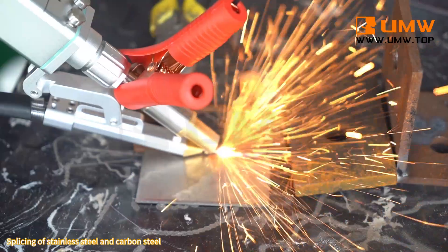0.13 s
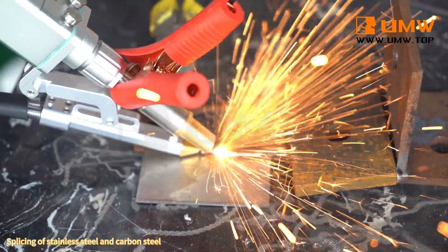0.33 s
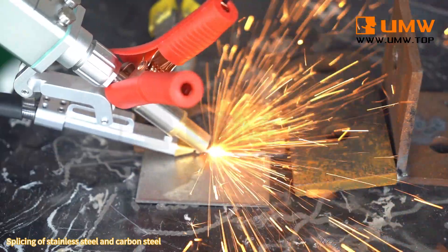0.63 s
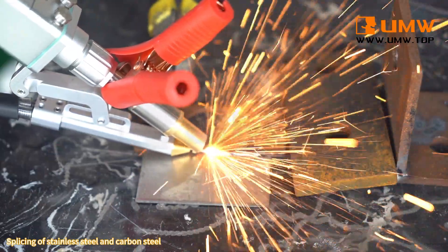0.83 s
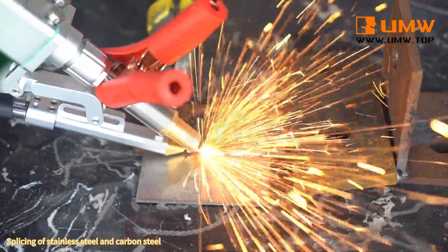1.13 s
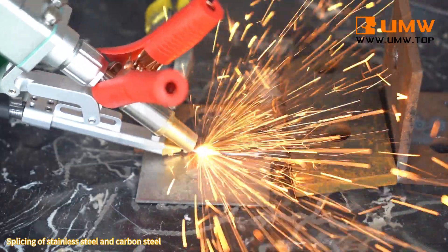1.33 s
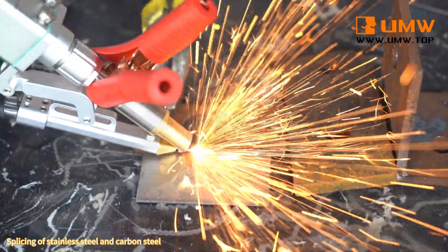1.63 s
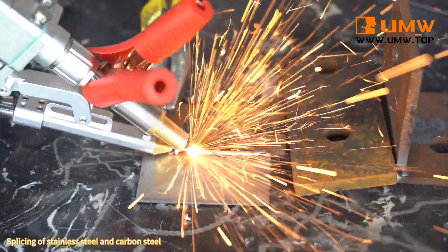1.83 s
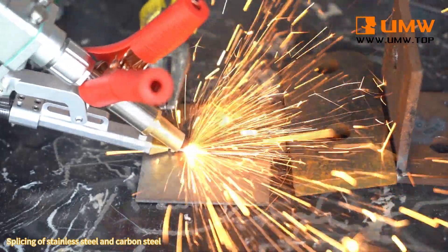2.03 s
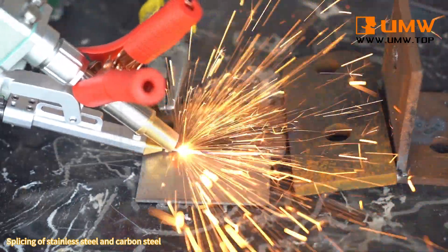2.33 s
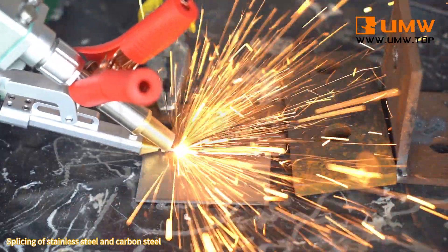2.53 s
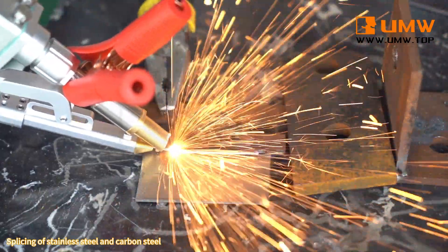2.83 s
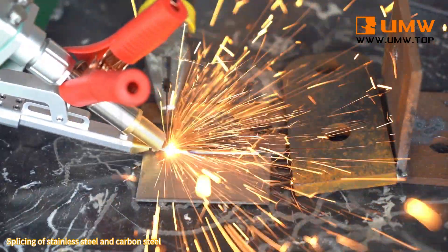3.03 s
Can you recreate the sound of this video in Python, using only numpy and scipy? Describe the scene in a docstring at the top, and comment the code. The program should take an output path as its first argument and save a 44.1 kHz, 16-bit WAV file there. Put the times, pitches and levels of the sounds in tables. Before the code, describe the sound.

A handheld laser welder hisses loudly and steadily, its bright sizzle carrying a faint rapid buzz.

```python
"""Hand-held laser welder

A laser welder runs along a steel seam, close to a camera with two microphone ports.
Shielding gas hisses: noise shaped by the nozzle's resonances, which change along the seam.
The beam swings to and fro: the vapour plume makes the treble sizzle in step, and overtones of the swing buzz.
Stray gas buffets the ports: a lumpy low rumble with a few short, sharp puffs."""
import sys
import numpy as np
from scipy import signal
from scipy.fft import rfft, irfft, next_fast_len
from scipy.io import wavfile
from scipy.ndimage import uniform_filter1d, map_coordinates

SR = 44100
rng = np.random.default_rng(int(sys.argv[2]) if len(sys.argv) > 2 else 0)


def invert_db(x):
    """Field ratio 10**(x/20) for x, a level in decibels (scalar or array-like)."""
    u = np.asarray(x, float) / 20
    return 10 ** u


def unload_audio(sound):
    """Save the sound as a 16-bit wav file, at the path given as the first command line argument."""
    columns = np.transpose(np.atleast_2d(sound))
    # keep every value between -1 and 1, then stretch to whole-number steps
    steps = np.round(np.clip(columns, -1, 1) * 32767)
    wavfile.write(sys.argv[1], SR, steps.astype(np.int16))


N = 139797  # length in samples
SWING_HZ = 98.8  # how often the beam swings to and fro
EAR = np.array([[.5], [-.5]])  # splits a left-over-right difference between left and right

# Resonances of nozzle and workpiece at mid-seam, before the hiss is set to its overall level.
# Each row: pitch in Hz, width in Hz, level in dB, left over right in dB.
RESONANCES = [(593, 73, -15, 0), (757, 310, -15, 0), (1675, 88, 1.5, 0), (2620, 350, -30, -5),
              (3105, 140, -4.5, 1), (3660, 110, -15, 5), (4690, 127, -6, 1), (5160, 320, -10, -9.5),
              (5503, 157, -2.5, 3), (6964, 203, -7, 1.5), (7600, 210, -21, -10), (8320, 150, -9, 0),
              (9255, 106, -5.5, 1.5), (9970, 150, -16, -8), (10620, 420, -13.5, -6), (11500, 240, -15, -10),
              (12240, 270, -18, 5), (13400, 640, -15, -4), (14120, 100, -13.5, 3)]


def unit(x):
    """Scale to an rms (average strength) of 1."""
    return x / np.sqrt(np.mean(x ** 2) + 1e-20)


def along(points, hz):
    """Read a value at each frequency from (Hz, value) points, on a log axis."""
    f, v = np.transpose(points)
    return np.interp(np.log(hz + 1), np.log(f + 1), v)


def curve(rows):
    """Join (seconds, value) points by straight lines, one value per sample."""
    return np.interp(np.arange(N) / SR, *np.transpose(rows))


def wobble(rate):
    """A smooth random curve through this many random points a second."""
    knots = rng.standard_normal(int(N * rate / SR) + 4)
    return map_coordinates(knots, [np.arange(N) * rate / SR])


def filtered(x, response):
    """Shape a sound by a response, real or complex, given as a function of frequency."""
    m = next_fast_len(N + 8192)
    hz = np.fft.rfftfreq(m, 1 / SR)
    return irfft(rfft(x, m) * response(hz), m)[..., :N]


def eddies(patchy_db, drift_db):
    """Turbulence: two white noises share quick patches of random gain and a slow drift of colour."""
    z = signal.stft(rng.standard_normal((2, N)), nperseg=512)[2]

    def blur(bins, frames):
        field = uniform_filter1d(rng.standard_normal(z.shape[1:]), bins, 0)
        return unit(uniform_filter1d(field, frames, 1))

    gain_db = patchy_db * blur(7, 10) + drift_db * blur(3, 70)
    return signal.istft(z * invert_db(gain_db), nperseg=512)[1][:, :N]


def ports(hz, alike):
    """Gains that turn two noises into mid and side, so that left and right are this much alike."""
    turn = np.arccos(np.clip(along(alike, hz), -1, 1)) / 2
    return np.array([np.cos(turn), np.sin(turn)])


def nozzle(hz, at):
    """Left and right response at a place on the seam (-.5 to .5): broad jet plus resonances, cut by dips."""
    # Broad hiss of the jet. Each row: frequency in Hz, relative level in dB.
    jet_tone = [(30, -75), (120, -48), (250, -55), (500, -28), (1200, -20.5), (4000, -17), (7000, -12.5),
                (11000, -16), (14500, -18), (16000, -24.5)]
    # Lean of the broad hiss. Each row: frequency in Hz, left over right in dB.
    jet_pan = [(2000, -1), (5000, -4), (9000, -10), (12000, 2.5), (15000, 2)]
    # What each resonance gains from one end of the seam to the other, in dB.
    travel_db = [-4.5, -2.5, -0.7, -26, -1, -4, 1.5, 4.5, -0.5, 0.5, 23.5, 12, -1.5, -6, -1, 0, 5, -2, 1]
    # Notches in the tone. Each row: frequency in Hz, width in Hz, depth in dB.
    dips = [(1060, 200, 6), (2030, 120, 10), (2800, 120, 5), (4890, 80, 3), (6200, 300, 3), (7470, 130, 8),
            (8570, 120, 5), (9650, 120, 4), (10200, 150, 5), (12370, 170, 7)]
    # How far left leads right at mid-seam, before the bass share below. Each row: frequency in Hz, radians.
    lead = [(3500, .05), (4400, 0.53), (6600, .05), (7800, 0.41), (10200, 0.52), (11500, .75),
            (15200, 0.71)]
    lead_grows = 1.4  # share of the mid-seam lead gained from end to end

    power = invert_db(2 * (along(jet_tone, hz) + EAR * along(jet_pan, hz)))
    for (c, w, db, pan_db), more_db in zip(RESONANCES, travel_db):
        peak = (hz * w) ** 2 / ((c * c - hz * hz) ** 2 + (hz * w) ** 2)
        peak = peak * np.minimum(hz / c, 1) ** 2  # thinner below its pitch
        power = power + invert_db(2 * (db + at * more_db + EAR * pan_db)) * peak

    # The deepest mid-seam dip climbs 90 Hz and deepens 6 dB along the seam.
    gap = (3890 + at * 90, 120, 15 + at * 6)
    dips_db = sum(db / (1 + (2 * (hz - c) / w) ** 2) for c, w, db in dips + [gap])

    bass_share = np.minimum(hz / 3500, 1)  # the lead fades towards the bass
    phase = EAR * along(lead, hz) * bass_share * (1 + at * lead_grows)
    return np.sqrt(power) * invert_db(-dips_db) * np.exp(1j * phase)


def travelling(x):
    """The torch moves: responses along the seam, with treble echoes off bench and clamps, fade into each other."""
    stages = 7  # places along the seam
    echo_count, echo_db = 6, -22  # for each ear; level reached from 5000 Hz up
    echo_s, echo_shift_s = .004, .00012  # longest mid-seam delay; largest change along the seam

    delay, shift = rng.random((2, echo_count, 2, 1))
    place = np.linspace(-.5, .5, N)
    m = next_fast_len(N + 8192)
    hz = np.fft.rfftfreq(2048, 1 / SR)
    spectrum = rfft(x, m)
    out = 0
    for at in np.linspace(-.5, .5, stages):
        late = echo_s * delay + echo_shift_s * at * (2 * shift - 1)
        bounces = np.exp(-2j * np.pi * hz * late).sum(0)
        echoes = 1 + invert_db(echo_db) * np.minimum(hz / 5000, 1) ** 2 * bounces
        # A short impulse response, centred and faded at both ends.
        kernel = np.roll(irfft(nozzle(hz, at) * echoes), 1024, 1) * np.hanning(2048)
        heard = irfft(spectrum * rfft(kernel, m), m)[:, 1024:N + 1024]
        nearness = np.clip(1 - abs(place - at) * (stages - 1), 0, 1)
        out = out + heard * nearness
    return out


def plume_flare():
    """The vapour plume flares at set moments of each beam swing, with random splutter on top."""
    # Flares before their average is removed and their strength wavers.
    # Each row: moment as share of the cycle, half width as share of the cycle, height in dB.
    flares = [(.485, .07, 4.6), (.9, .04, 4.2), (.04, .11, 3), (.66, .035, 1.8)]
    cycle = np.arange(N) / SR * SWING_HZ
    flare_db = 0
    for at, w, db in flares:
        away = (cycle - at + .5) % 1 - .5
        flare_db = flare_db + db * np.exp(-(away / w) ** 2)
    flare_db = (flare_db - flare_db.mean()) * (1 + .25 * wobble(20))
    splutter_db = 0.6 * wobble(24.27) + 0.66 * wobble(65) + 0.34 * wobble(300)
    return unit(invert_db(flare_db + splutter_db))


def hiss():
    """Turbulent gas rings the nozzle; its treble follows the flaring plume."""
    # How much of the hiss flares. Each row: frequency in Hz, share from 0 to 1.
    plume = [(3000, .05), (6000, .3), (8000, .9), (15000, .95)]
    # How alike left and right noise start out. Each row: frequency in Hz, likeness (1 is the same).
    likeness = [(100, 1), (450, 0.97), (750, 0.99), (1050, 0.99), (1400, 1), (1850, 0.99), (2060, 0.55),
                (2450, 0.81), (2850, 0.76), (3300, 0.91), (4350, 0.58), (4800, 0.76), (5700, 1),
                (6500, 0.77), (7200, 0.96), (8000, 0.76), (8800, 0.69), (10000, 0.89), (12000, 0.83),
                (14000, 0.87), (15700, 0.8)]
    # Strength of the gas, before a small random wobble. Each row: time in seconds, level in dB.
    flow = [(0.0, -17), (0.08, -16), (3.17, -16.5)]
    # How hard the second resonance sings. Each row: time in seconds, gain at its centre in dB.
    whistle = [(0, -1), (.5, -0.7), (.75, 1.5), (1.05, 0), (2.7, 0), (3.0, 1), (3.17, -1.5)]

    def share(hz):
        return np.clip(along(plume, hz), 0, 1)

    raw = eddies(patchy_db=0.84, drift_db=.5)
    flaring = filtered(raw * plume_flare(), share)
    steady = filtered(raw, lambda hz: 1 - share(hz))
    mid, side = filtered(flaring + steady, lambda hz: ports(hz, likeness))
    jet = unit(travelling(np.array([mid + side, mid - side])))

    c, w = RESONANCES[1][:2]
    singing = filtered(jet, lambda hz: 1 / (1 + ((hz - c) / (2 * w)) ** 2))
    jet = jet + (invert_db(curve(whistle)) - 1) * singing
    return invert_db(curve(flow) + 0.55 * wobble(25.46)) * jet


def buzz():
    """The swinging beam drives slightly unsteady overtones of its swing rate."""
    # Each row: multiple of the swing rate, level in dB above the base level below.
    overtones = [(2, -16), (5, -2), (6, -6), (7, 1), (9, 3), (10, -3), (12, -4)]
    base_db = -49.5
    t = np.arange(N) / SR
    out = 0
    for k, db in overtones:
        level = invert_db(base_db + db + 2.4 * wobble(4.86))
        out = out + level * np.sin(2 * np.pi * (k * SWING_HZ * t + rng.random()))
    return out


def rumble():
    """Stray gas buffets each port differently: low noise with lumpy loudness."""
    # Tone of the rumble. Each row: frequency in Hz, relative level in dB.
    rumble_tone = [(20, -25), (50, -2), (120, 0.5), (280, 1.5), (500, -3), (1000, -15), (2000, -67)]
    # Strength of the buffeting, before the lumps and the low cut. Each row: time in seconds, level in dB.
    draught = [(0.0, -49.5), (0.23, -73), (0.29, -42.5), (.4, -46), (0.53, -57), (0.57, -45), (0.64, -51),
               (0.68, -38), (0.8, -40.5), (0.91, -62), (1.02, -49), (1.2, -46), (1.34, -37), (1.39, -58),
               (1.76, -68), (1.81, -39), (1.97, -43), (2.05, -35), (2.08, -52), (2.14, -49), (2.2, -35),
               (2.33, -45.5), (2.47, -67), (2.52, -48), (2.67, -59), (2.73, -40), (3.03, -65), (3.14, -41),
               (3.17, -44)]
    likeness = [(60, 1.0), (150, 0.9), (300, 0.5), (800, .1)]  # Hz, how alike left and right are
    shared_db = 1.5 * wobble(34.8)
    separate_db = 1.7 * np.array([wobble(29.75), wobble(30.3)])
    lumps = invert_db(shared_db + separate_db)
    noise = eddies(patchy_db=1.0, drift_db=-0.1)
    mid, side = filtered(noise, lambda hz: invert_db(along(rumble_tone, hz)) * ports(hz, likeness))
    return invert_db(curve(draught)) * unit(lumps * np.array([mid + side, mid - side]))


def sharp_puffs():
    """Each sharp puff of stray gas is a pulse of a cycle or two whose pitch climbs."""
    # Before the low cut. Each row: time in seconds, peak level in dB, middle pitch in Hz, left over right in dB.
    puffs = [(0.292, -31, 264, -1), (.679, -26.5, 253, 3), (0.688, -24.5, 302, -1), (.735, -32, 240, 0),
             (1.324, -38, 230, 12), (1.816, -26, 254, 2.5), (2.051, -18, 435, 1), (2.196, -16.5, 360, 1),
             (2.201, -26, 280, -6), (2.73, -26, 400, -4)]
    half_cycles, rise = .9, .25  # half length in cycles; share the pitch climbs over that
    t = np.arange(N) / SR
    out = 0
    for s, db, hz, pan_db in puffs:
        u = (t - s) * hz / half_cycles
        start = 2 * np.pi * rng.random() + np.array([[0], [1.2]])  # radians; right runs ahead
        wave = np.sin(2 * np.pi * hz * (t - s) * (1 + rise * u / 2) + start)
        out = out + invert_db(db + EAR * pan_db) * np.exp(-u * u) * wave
    return out


def scene():
    """Gas hiss, beam buzz and stray draught together."""
    return hiss() + buzz() + rumble() + sharp_puffs()


def low_pass(x):
    """Removes everything above the highest recorded frequency."""
    return signal.sosfilt(signal.butter(12, 15940, fs=SR, output="sos"), x)


def record(dry):
    """The camera cuts the lows gently, twice over, and everything from the top limit up."""
    low_cut_hz, top_hz = 110, 15740

    def response(hz):
        low_cut = (1j * hz / (low_cut_hz + 1j * hz)) ** 2
        return (hz < top_hz) * low_cut

    mix = filtered(dry, response)
    return low_pass(mix)


dry = scene()
out = record(dry)
unload_audio(out)
```